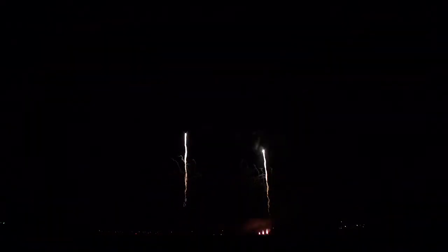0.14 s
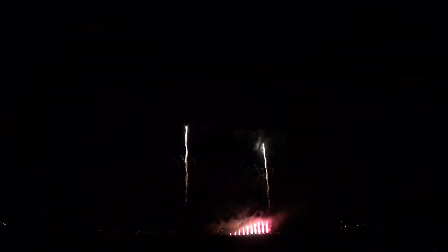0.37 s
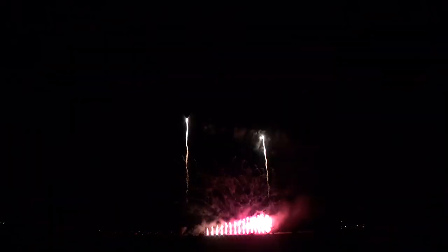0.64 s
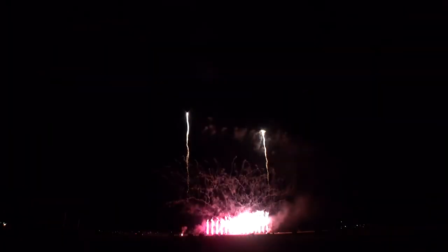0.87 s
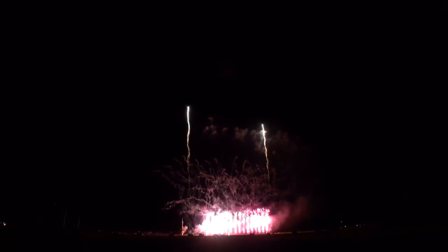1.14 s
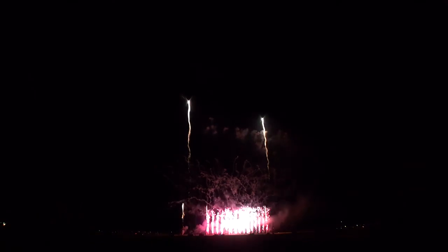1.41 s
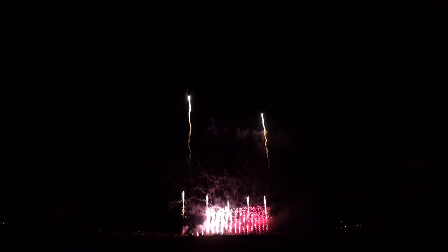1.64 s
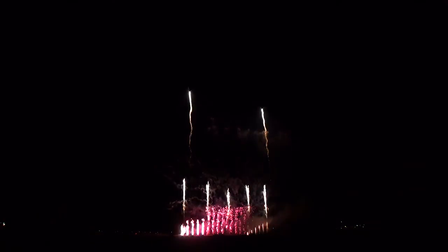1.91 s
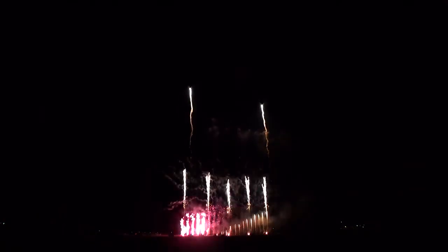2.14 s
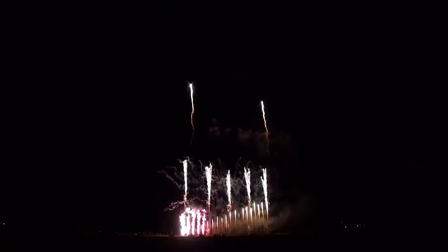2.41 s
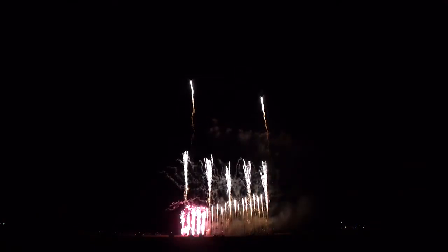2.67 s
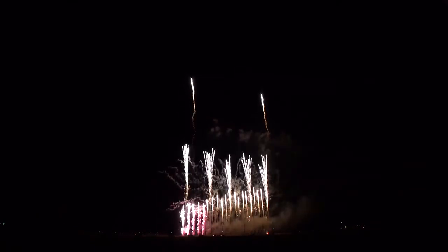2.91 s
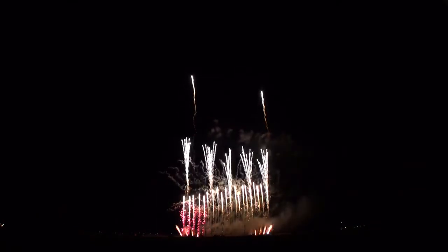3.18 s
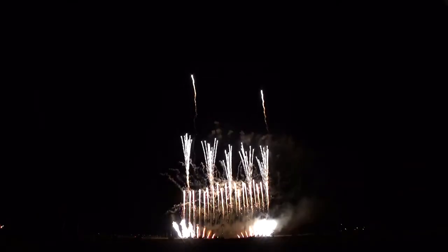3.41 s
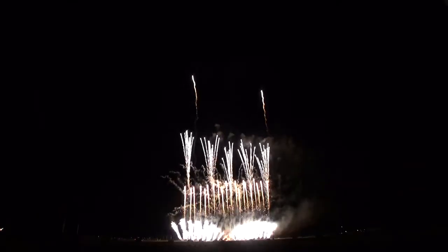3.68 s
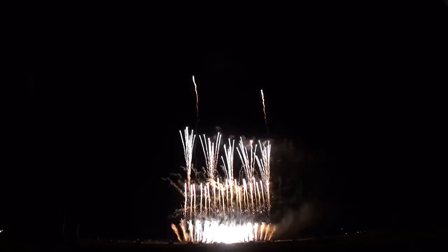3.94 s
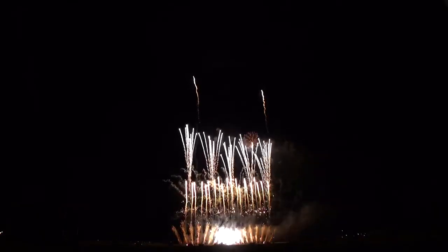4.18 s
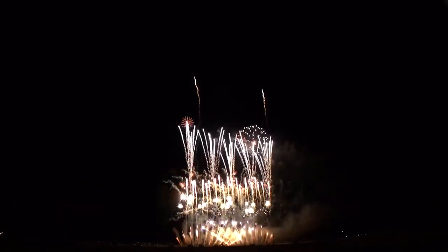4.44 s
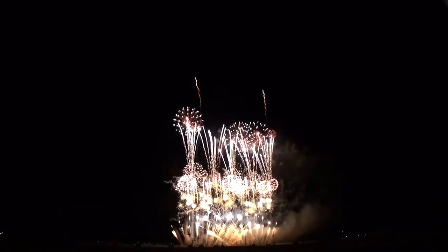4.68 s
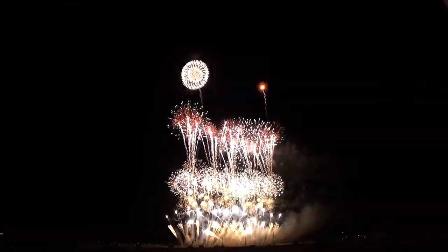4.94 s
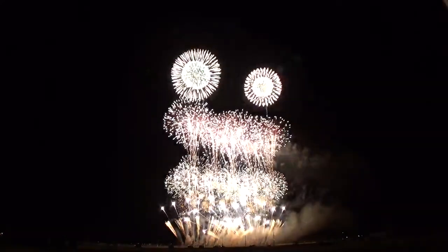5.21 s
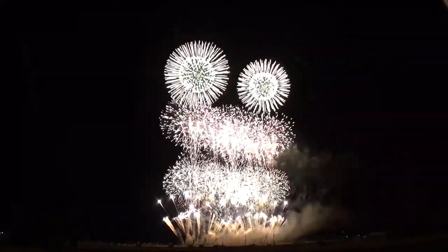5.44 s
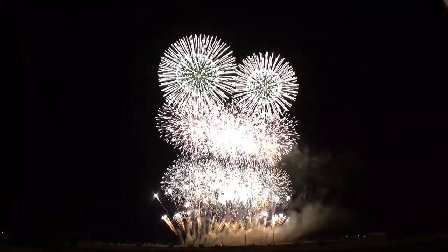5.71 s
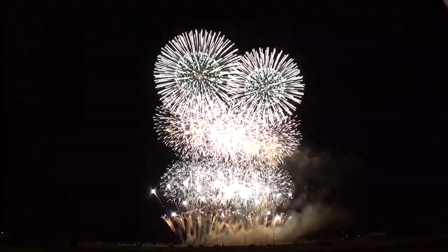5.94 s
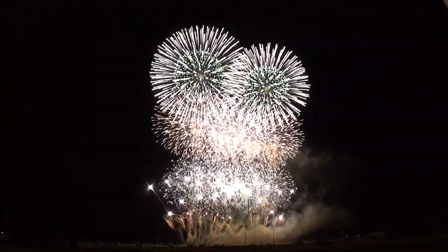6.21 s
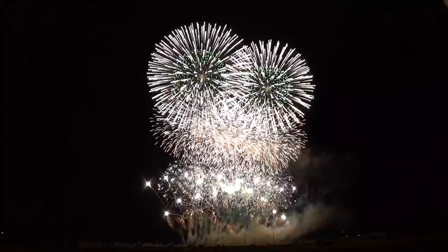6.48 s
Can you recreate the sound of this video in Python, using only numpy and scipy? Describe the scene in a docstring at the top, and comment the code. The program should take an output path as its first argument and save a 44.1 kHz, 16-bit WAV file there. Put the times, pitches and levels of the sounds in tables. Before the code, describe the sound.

A fireworks volley heard from a distance across a dark open field. After a quiet rumble with faint pops, mortars fire in rapid dull cracks with soft thumps, one cluster much louder. Thin wavering whistles slide downward behind more scattered launches. Near the end the shells burst in a dense, violent roll of sharp bangs, slightly distorting the microphone, with short echoes.

```python
"""A fireworks volley heard across open ground at night. Far mortars fire first, in runs of cracks made of
scattered noise, each with a slower low thump, over a lumpy rumble and roar of filtered noise. Whistling shells
then climb in two swarms of wavering, falling sine tones. At last the shells burst overhead in a dense roll of
steep ringing pulses, loud enough to overload the recorder softly; echoes trail the cracks and the blasts."""
import sys
import numpy as np
from scipy import signal
from scipy.fft import rfft, irfft
from scipy.io import wavfile

SR = 44100
rng = np.random.default_rng(int(sys.argv[2]) if len(sys.argv) > 2 else 0)


def natural_amplitude(level_db):
    """Convert a level in decibels to a linear amplitude factor, elementwise."""
    exponent = np.asarray(level_db, float) / 20
    return 10 ** exponent


def int16_out(signal):
    """Quantize to a 16-bit WAV file."""
    q = np.round(np.clip(np.atleast_2d(signal).T, -1, 1) * 32767)
    wavfile.write(sys.argv[1], SR, q.astype(np.int16))


N = 290663


def rms_one(x):
    """Normalisation: scale a signal to unit root mean square."""
    return x / np.sqrt(np.mean(x ** 2) + 1e-20)


def in_time(rows):
    """Linear interpolation: turn rows of (seconds, values ..) into one curve a column."""
    s, *columns = np.transpose(rows)
    return [np.interp(np.arange(N) / SR, s, c) for c in columns]


def band(x, low_hz, high_hz, order=2):
    """Band-pass filtering with a Butterworth response."""
    return signal.sosfilt(signal.butter(order, [low_hz, high_hz], "band", fs=SR, output="sos"), x)


def low(x, hz, order=2):
    """Low-pass filtering with a Butterworth response."""
    return signal.sosfilt(signal.butter(order, hz, fs=SR, output="sos"), x)


def drift(corner_hz):
    """Relaxation process: white noise through a one-pole low-pass wanders slowly with unit spread."""
    step_hz = 400
    steps = rng.standard_normal(int(N / SR * step_hz) + 2)
    memory = np.exp(-2 * np.pi * corner_hz / step_hz)
    wander = rms_one(signal.lfilter([1], [1, -memory], steps))
    return np.interp(np.linspace(0, len(steps) - 1, N), np.arange(len(steps)), wander)


def add(track, s, sound):
    """Superposition: lay a sound onto the track from time s on."""
    i = int(s * SR)
    track[..., i:i + sound.shape[-1]] += sound[..., :N - i]


def pair(mid, side):
    """Mid-side stereo: left is the sum, right the difference."""
    return np.array([mid + side, mid - side])


def uneven(start_s, end_s, gap_s):
    """Jittered succession: gaps run from half to one and a half times the mean."""
    s = start_s + gap_s * np.r_[0, np.cumsum(.5 + rng.random(60))]
    return s[s < end_s]


def blast(t, hz):
    """Damped oscillation: a steep front swings over and rings out in a couple of cycles."""
    front = .2 * np.exp(-t / .0008)
    ringing = .7 * np.cos(2 * np.pi * hz * t) * np.exp(-t * hz / .7)
    return -(front + ringing)


# Sharp shell bursts overhead. Each row: start in seconds, relative blast level in dB,
# relative level of the sharp edge in dB.
SHARP_BURSTS = [(5.682, 5.5, -17.5), (5.7744, 0, 4.5), (5.7903, 4.5, -12.5), (5.8085, 2.5, -0.5),
                (5.8442, 6, -2.5), (5.8564, -22.5, -1.5), (5.872, 2, -15.5), (5.8901, 2, -7),
                (5.9117, -1, -6), (5.93, -1.5, -14.5), (5.9513, 3, -5.5), (5.9872, 4, -6), (6.0017, 9, -15),
                (6.0355, -4, 6.5), (6.06, 6, -1), (6.0728, -2, 2), (6.0807, 4, -13.5), (6.0957, 7, -19.5),
                (6.1124, -1.5, 3), (6.138, -3, 3), (6.1417, 6.5, -11), (6.1716, 6, -5), (6.185, 7.5, 0.5),
                (6.2136, -1, -13), (6.2376, 5, 3), (6.2898, -7, 13), (6.3036, -1, 2.5), (6.3181, -5, -3.5),
                (6.3225, -2.5, 7), (6.3473, 1, -2.5), (6.3659, 1, -3.5), (6.3881, -1.5, -11.5),
                (6.394, 4.5, 0.5), (6.3994, -5, 13), (6.4211, 0.5, -8.5), (6.4338, -1, 7), (6.4494, -15, 6),
                (6.4611, -12, -6), (6.4878, -17, 14.5), (6.5213, -1, -1.5), (6.5358, -0.5, 3.5),
                (6.5497, 1, 5.5), (6.5646, -2.5, 8.5)]
# Pitch at which the larger blasts ring through the roll. Each row: time in seconds, middle ring frequency in Hz.
RING_PITCH = [(5.68, 194), (5.77, 278), (6.15, 279), (6.59, 193)]
RING_SPREAD = 0.22    # natural-log spread of the ring frequency
BOUNCE_S, BOUNCE_DB, BOUNCE_SPREAD_DB, BOUNCE_EDGE_DB = 0.0028, -8.5, 2, -26    # relative to the direct blast
FAR_FROM_S, FAR_GAP_S, FAR_DB, FAR_EDGE_DB = 5.86, .015, 2, -19    # far shells with rounded fronts
SMALL_FROM_S, SMALL_PER_S, SMALL_DB = 5.84, 150.0, -14.5    # the level is that of the faintest
BLUNTING = 0.14       # share of a negative edge dB by which the body's low-pass corner sinks


def small_shells():
    """Poisson process: small shells at independent moments; rows of s, dB, ring Hz, edge dB."""
    gap, loudness, pitch, edge = rng.random((4, 400))
    s = SMALL_FROM_S + np.cumsum(-np.log(gap)) / SMALL_PER_S
    rows = np.c_[s, SMALL_DB + 9.0 * loudness, 250 + 400 * pitch, -8 - 20 * edge]
    return rows[s < N / SR]


def large_shells():
    """Ground reflection: sharp shells, their blunted bounces, and far shells; rows of s, dB, ring Hz, edge dB."""
    s, db, edge_db = np.transpose(SHARP_BURSTS)
    stray_db = BOUNCE_SPREAD_DB * np.clip(rng.standard_normal(len(s)), -2, 1)
    bounces = np.c_[s + BOUNCE_S, db + BOUNCE_DB + stray_db, edge_db + BOUNCE_EDGE_DB]
    far_s = uneven(FAR_FROM_S, N / SR, FAR_GAP_S)
    far_stray, edge_stray = rng.standard_normal((2, len(far_s)))
    far = np.c_[far_s, FAR_DB + 3.1 * far_stray, FAR_EDGE_DB + 5.0 * edge_stray]
    shells = np.r_[np.c_[s, db, edge_db], bounces, far]
    ring_hz = np.interp(shells[:, 0], *np.transpose(RING_PITCH))
    ring_hz = ring_hz * np.exp(RING_SPREAD * rng.standard_normal(len(shells)))
    return np.c_[shells[:, :2], ring_hz, shells[:, 2]]


def bursts():
    """Pulse superposition: each blast is a rounded body plus a sharp treble edge, the edge spread wider."""
    t, out = np.arange(1500) / SR, np.zeros((2, N))
    shells = np.r_[large_shells(), small_shells()]
    for (s, db, hz, edge_db), sign in zip(shells, rng.choice([-1, 1], len(shells))):
        wave = blast(t, hz)
        body = low(wave, 3200 * natural_amplitude(BLUNTING * min(edge_db, 0)))
        edge = natural_amplitude(edge_db + 0.5) * (wave - low(wave, 1100, order=1))
        side = sign * (0.022 * body + 0.35 * edge)
        add(out, s, natural_amplitude(db + 0.5) * pair(body + edge, side))
    return low(band(out, 92, 7200, order=1), 10100, order=6)


# Mortar lifts placed one by one, loud and moderate. Each row: time of the front in seconds,
# relative crack level in dB.
SINGLE_LIFTS = [(1.7885, -17), (1.8324, -15.5), (1.8591, -15), (1.9068, -16.5), (1.9228, -15.5),
                (1.98, -15.5), (2.0197, -16.5), (2.3025, -4), (2.3654, -3.5), (2.3848, 0.5), (2.407, -7.5),
                (2.4193, -6), (2.4377, -7.5), (2.4566, -2), (2.4686, -4.5), (2.478, -16), (2.5383, -6),
                (2.564, -14), (2.588, -6), (2.5982, -1), (2.6075, -4.5), (2.622, -4.5), (2.6583, -22),
                (3.0351, -19), (3.0527, -20), (3.0924, -19), (3.1214, -18.5), (3.4416, -19), (3.489, -12.5),
                (3.5003, -17.5), (3.5175, -10.5), (3.5394, -11), (3.5622, -11.5), (3.5727, -11),
                (3.592, -11.5), (3.643, -15.5), (3.6243, -12), (3.6561, -11.5), (3.6771, -6.5),
                (3.7056, -11.5), (3.7189, -11), (3.7412, -12.5), (3.7721, -10.5), (3.803, -10),
                (3.835, -12), (4.3565, -14.5), (4.424, -14), (4.5084, -15), (4.5924, -17.5),
                (4.6613, -16.5), (4.7458, -14), (4.8015, -15), (4.8279, -15), (4.855, -18), (4.896, -13.5),
                (4.9479, -9.5), (5.0022, -19), (5.0462, -20.5), (5.179, -23), (5.1984, -20.5),
                (5.2584, -14), (5.2979, -17), (5.3451, -10.5), (5.4157, -22), (5.4318, -11.5),
                (5.4611, -16), (5.5052, -12.5), (5.5951, -10.5), (5.621, -9)]
# Single pops and runs of pops at uneven gaps, many of them fainter or duller. Each row: start in seconds,
# end in seconds, mean gap in seconds, relative crack level at the start in dB, fade over the run in dB
# (negative grows), middle colour in Hz.
POP_RUNS = [(0.066, 0.07, .03, -33.5, 0.1, 980), (0.171, 0.18, 0.056, -19.5, 0.1, 540),
            (0.223, 1.6, .11, -40.5, 20, 800), (1.811, 2.0, 0.021, -21, 3.5, 1290),
            (2.064, 2.28, 0.021, -36, 0.5, 1290), (2.636, 2.705, 0.013, -11.5, 2.5, 1460),
            (2.716, 2.84, 0.019, -25, 26.5, 1200), (2.875, 2.99, .016, -18.5, 8, 640),
            (3.466, 3.818, .04, -18.5, -7.8, 1130), (3.866, 4.251, 0.029, -23, 14.5, 876),
            (4.621, 5.6, .05, -29, -6.5, 1303)]
POP_SPREAD_DB = 1.5
LIFT_HZ, LIFT_HZ_SPREAD = 1480, .12    # middle colour of a single lift in Hz, natural-log spread of any colour
THUMP_DB, THUMP_FOLLOWS, THUMP_SPREAD_DB = -14, 0.77, 3.5    # THUMP_FOLLOWS: share of the crack dB
DULL_THUMP_DB_PER_OCTAVE = 1.5    # duller pops carry more thump


def shots():
    """Spectral balance: a duller crack carries more thump; rows of s, crack dB, thump dB, colour Hz."""
    rows = [(s, db, LIFT_HZ) for s, db in SINGLE_LIFTS]
    for start_s, end_s, gap_s, db, fade_db, hz in POP_RUNS:
        s = uneven(start_s, end_s, gap_s)
        stray = rng.standard_normal(len(s))
        stray[0] = 0
        progress = (s - start_s) / (end_s - start_s)
        pop_db = db - fade_db * progress + POP_SPREAD_DB * stray
        rows += [(at, each_db, hz) for at, each_db in zip(s, pop_db)]
    s, db, hz = np.transpose(rows)
    thump_stray, colour_stray = rng.standard_normal((2, len(s)))
    thump_db = THUMP_DB + THUMP_FOLLOWS * db + THUMP_SPREAD_DB * thump_stray
    thump_db += DULL_THUMP_DB_PER_OCTAVE * np.log2(LIFT_HZ / hz)
    return np.c_[s, db, thump_db, hz * np.exp(LIFT_HZ_SPREAD * colour_stray)]


# faint lead-in before the front: share at 0 dB, growth per dB of weakness
LEAD_SHARE, LEAD_GROWTH = .05, .03


def lifts():
    """Turbulent scattering spreads each crack over a few ms; the lows creep along the ground and swell late."""
    t = np.arange(4096) / SR
    swell = np.sin(2 * np.pi * 82 * (t - .002)) * (t / 0.014) ** 1.41 * np.exp(1.53 * (1 - t / 0.012))
    swell += 0.53 * np.sin(2 * np.pi * 60 * t) * np.exp(-t / 0.027)
    front_s = .005
    after = np.maximum(t - front_s, 0)
    lead = np.where(after > 0, 0, t / front_s)
    spread = (after > 0) * (np.exp(-(after / 0.0037) ** 0.8) + 0.13 * np.exp(-after / 0.02))
    cracks, thumps = np.zeros((2, N)), np.zeros(N)
    for s, crack_db, thump_db, hz in shots():
        envelope = spread + lead * np.clip(LEAD_SHARE - LEAD_GROWTH * crack_db, 0, 1)
        scattered = rng.standard_normal((2, 4096)) * envelope
        scattered[0, 220] -= 9 * natural_amplitude(crack_db / 2)    # strong lifts keep a steep direct front
        mid, side = band(scattered, hz / 1.98, hz * 1.937) + 7e-5 * hz * scattered
        gain = natural_amplitude(crack_db) / np.sqrt(np.sum(mid ** 2) / 60)
        add(cracks, s - front_s, gain * pair(mid, 0.12 * side))
        add(thumps, s, natural_amplitude(thump_db) * swell)
    # a long path through air takes the treble
    far_cracks = low(cracks, 2137, order=6) + 0.1 * band(cracks, 2790, 5280)
    return far_cracks, thumps


# Whistling shells, one table a swarm. Each row: time in seconds, middle pitch in Hz, relative level in dB.
WHISTLE_SWARMS = [
    [(2.7, 4100, -70), (3.0, 3876, -66.5), (3.4, 3720, -61.5), (3.9, 3430, -54), (4.5, 3138, -50.5),
     (5.8, 2809, -50)],
    [(3.9, 5270, -110), (4.15, 5010, -84), (4.5, 4605, -83), (5.0, 4090, -69), (5.8, 3585, -61)],
]


def whistles():
    """Frequency modulation: each shell shrieks on its own wavering pitch, which falls as the charge burns."""
    out = np.zeros((2, N))
    for swarm in WHISTLE_SWARMS:
        hz, db = in_time(swarm)
        for offset, sign in zip(np.linspace(-1, 1, num=22), rng.choice([-1, 1], size=22)):
            pitch = hz * (1 + .135 * offset + .008 * drift(1) + .0025 * drift(60))
            fringe_db = -12 * offset ** 2    # shells at the fringe are fainter
            loudness = natural_amplitude(db - 7 + fringe_db + 5.5 * drift(6))
            tone = np.sin(2 * np.pi * np.cumsum(pitch) / SR) * loudness
            out += pair(tone, 0.35 * sign * np.roll(tone, 3))
    out[:, :int(WHISTLE_SWARMS[0][0][0] * SR)] = 0    # silent until the first swarm
    return out


def echoes(x, t60, low_hz, high_hz, order=2):
    """Reverberation: trees, banks and far walls send back a dull diffuse tail, falling 60 dB in t60 seconds."""
    t = np.arange(int(1.5 * SR)) / SR
    envelope = natural_amplitude(-60 * t / t60) * np.minimum(t / 0.0059, 1)
    mid, side = band(rng.standard_normal((2, len(t))), low_hz, high_hz, order) * envelope
    tail = pair(mid, 0.55 * side)
    return signal.fftconvolve(x, tail / np.sqrt(np.sum(tail ** 2)), axes=1)[:, :N]


# Far rumble of rolling echoes. Each row: time in seconds, rumble level in dB, roar level in dB.
FAR_LEVELS = [(0, -51, -48.5), (.5, -51.5, -54.5), (1.7, -54.5, -56.5), (2.1, -54, -44.5),
              (2.8, -41, -35.5), (3.3, -49, -48), (4.0, -40.5, -38), (4.3, -52, -49.5), (5.7, -46.5, -43),
              (6.0, -29.5, -42)]
# Spectrum of the roar. Each row: frequency in Hz, relative density in dB per Hz.
ROAR_SPECTRUM = [(100, -8.5), (170, -30.5), (300, -6), (900, -4.5), (2000, -18.5), (3000, -32),
                 (8000, -96.5)]


def far_off():
    """Spectral shaping of noise: a low rumble and a dull roar, both lumpy."""
    rumble_db, roar_db = in_time(FAR_LEVELS)
    hz = np.arange(N // 2 + 1) * SR / N + 1
    shape_hz, shape_db = np.transpose(ROAR_SPECTRUM)
    shape = natural_amplitude(np.interp(np.log(hz), np.log(shape_hz), shape_db))
    mid, side = rms_one(irfft(rfft(rng.standard_normal((2, N))) * shape, N))
    roar = pair(mid, .5 * side) * natural_amplitude(roar_db + 2 * drift(9.8))
    mid, side = rms_one(band(rng.standard_normal((2, N)), 48, 112))
    rumble = pair(mid, 0.23 * side) * natural_amplitude(rumble_db + 0.69 * drift(1.4))
    return roar + rumble


def scene():
    """Superposition of ground, sky, whistles and far background, the right channel slightly louder."""
    cracks, thumps = lifts()
    blasts = bursts()
    ground = cracks + thumps + natural_amplitude(-21.5) * echoes(cracks, t60=1.0, low_hz=330, high_hz=2600)
    sky = blasts + natural_amplitude(-14.5) * echoes(blasts, t60=0.35, low_hz=440, high_hz=4400, order=1)
    return (ground + sky + whistles() + far_off()) * natural_amplitude([[-.4], [.4]])


def band_limit(x):
    """A steep low-pass at the top of the band."""
    return signal.sosfilt(signal.butter(12, 11720, fs=SR, output="sos"), x)


def record(dry):
    """Soft saturation: the loudest fronts overload smoothly, over a faint hiss."""
    overloaded = dry / (1 + np.abs(dry / .98) ** 4) ** (1 / 4)
    hiss = natural_amplitude(-90) * rng.standard_normal(dry.shape)
    return band_limit(overloaded + hiss)


dry = scene()
out = record(dry)
int16_out(out)
```